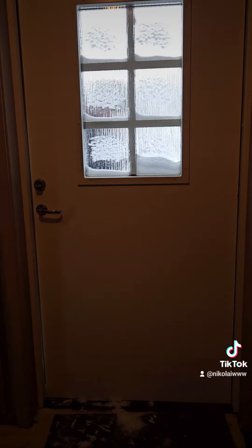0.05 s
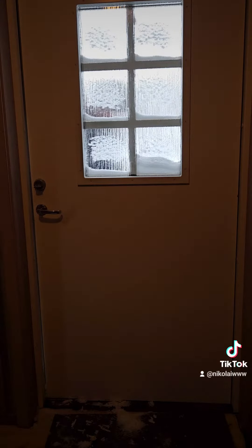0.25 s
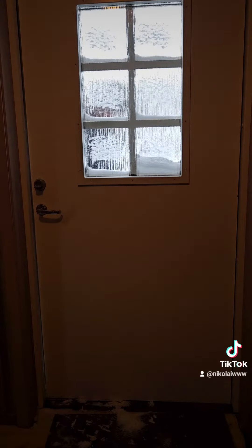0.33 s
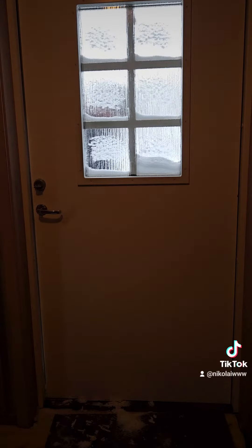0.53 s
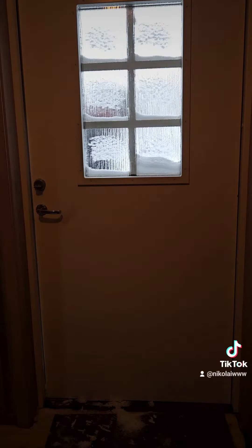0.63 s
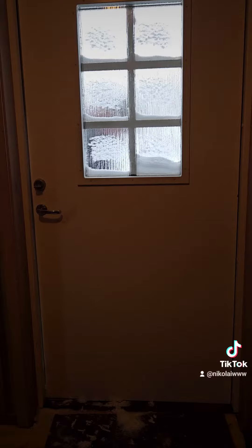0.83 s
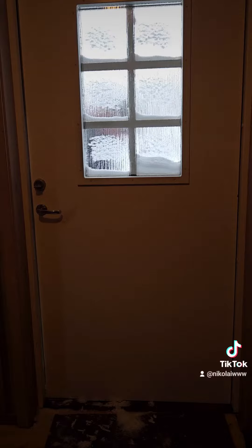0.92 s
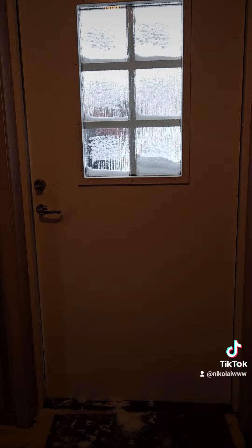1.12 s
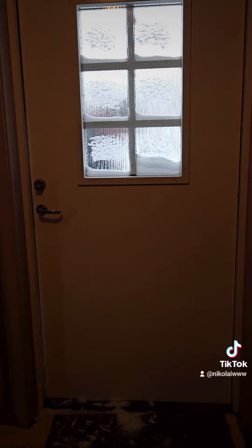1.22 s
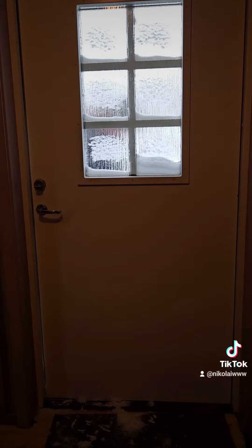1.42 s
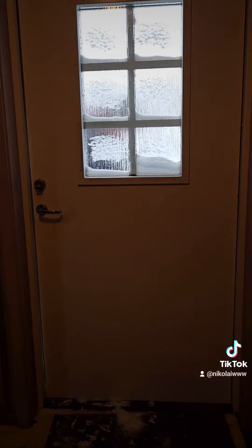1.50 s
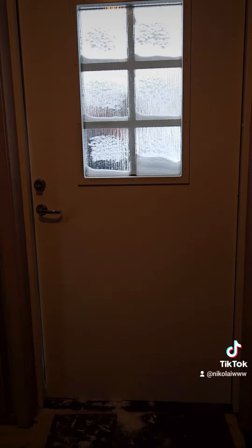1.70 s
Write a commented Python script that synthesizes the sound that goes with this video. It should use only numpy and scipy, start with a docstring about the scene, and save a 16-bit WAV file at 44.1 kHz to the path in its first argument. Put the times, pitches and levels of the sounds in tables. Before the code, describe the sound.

A stiff tool scrapes a frosty wooden door, heard from inside a small, quiet hallway. At about 0.2 seconds it lands with crunchy knocks and a deep thump. A rasping stroke runs from 0.4 to 0.9 seconds, ending in knocks. A harder stroke follows from 1.0 to 1.6 seconds, making the wood drone, with more knocks and a tiny squeak near 1.3 seconds. A faint low hush lies underneath.

```python
"""In a small, quiet hallway, a stiff tool is heard bumping against the outside of a wooden door and
scraping over its frosty face in two strokes. Stick-slip friction makes dense catches that rasp, ring the
tool's edge and drive the damped modes of the panel. Knocks crunch the frost, harder bumps rock the door
in its frame, and the edge squeaks twice. Close walls add short reflections; the house keeps a low hush."""
import sys
import numpy as np
from scipy import signal
from scipy.fft import rfft, irfft
from scipy.io import wavfile
from scipy.ndimage import uniform_filter1d

SR = 44100
rng = np.random.default_rng(int(sys.argv[2]) if len(sys.argv) > 2 else 0)


def wrap_up_sound(samples):
    """Save the sound to the file named by the first command line argument, as 16-bit audio."""
    columns = np.atleast_2d(samples).T
    # keep every value between -1 and 1, then stretch to whole-number steps
    tamed = np.clip(columns, -1, 1)
    steps = np.round(tamed * 32767).astype(np.int16)
    wavfile.write(sys.argv[1], SR, steps)


N = 77175
T = np.arange(N) / SR


def scraping():
    """Sliding friction: two strokes of the tool over the frost, the second pressed harder."""
    # Each row: time in seconds, rasp level in dB, extra treble in dB, drone level in dB, drone pitch in Hz.
    first_path = [(.33, -68, 4, -48, 230), (.40, -57, 3, -63, 300), (.445, -44, 2, -59, 383),
                  (.475, -41.5, 4.5, -38, 400), (.53, -40, 1, -42, 407), (.60, -36.5, -1, -39.5, 425),
                  (.65, -37.5, -2.5, -40.5, 354), (.70, -39.5, -3.5, -39.5, 399), (.73, -42.5, 1, -41, 180),
                  (.81, -41, 1.5, -49, 190), (.865, -50, 1, -54, 420), (.895, -60, -6, -75, 298)]
    second_path = [(1.025, -52, -24, -59, 252), (1.044, -42, -18, -39, 257), (1.06, -38.5, -32, -39.5, 242),
                   (1.118, -53, 4.5, -40.5, 243), (1.14, -34.5, -11.5, -33.5, 232),
                   (1.18, -35.5, -1, -29.5, 222), (1.21, -42.5, 0.5, -39, 211),
                   (1.262, -32.5, -3, -37.5, 248), (1.295, -31.5, -4, -31, 267),
                   (1.355, -34.5, 3.5, -30, 243), (1.395, -38, -3.5, -35, 219), (1.44, -35, 2, -34, 220),
                   (1.52, -42, -1.5, -43.5, 228), (1.605, -48, 2, -61, 220), (1.665, -75, -12, -71, 215)]
    # Each row: frequency in Hz, relative spectral density of the rasp in dB.
    first_rasp = [(30, 7.5), (65, 16), (110, 8), (420, -10), (560, 8), (950, 1.5), (1500, 2.5), (2200, 7.5),
                  (2700, -6.5), (4800, -6.5), (8800, -13.5), (9700, -23), (15500, -27)]
    second_rasp = [(30, -6), (72, 4), (115, -22), (200, -23), (420, 3), (530, -5), (660, 2), (900, -12),
                   (1500, -0.5), (2200, 1), (2700, -12.5), (4800, -10), (8800, -17), (9700, -26.5),
                   (15500, -32.5)]
    first = stroke(first_path, first_rasp, edge_db=-10.0, octaves=0.15)
    second = stroke(second_path, second_rasp, edge_db=-2.26, octaves=0.44)
    return first + second


def stroke(path, spectrum, edge_db, octaves, treble_hz=3830, groan_db=-6):
    """Forced vibration: catches rasp, ring the edge and make the panel drone at a shifting pitch."""
    # Each row: frequency of a mode of the edge in Hz, relative level in dB, 60 dB decay time in seconds.
    edge_modes = [(1576, -15, .2), (2010, 1, .014), (2125, 6, .034), (2265, 8, .045), (2340, 2, .045)]
    times, rasp_db, treble_db, drone_db, drone_hz = np.array(path).T
    rasp, drone = (np.interp(T, times, undb(db), left=0, right=0) for db in (rasp_db, drone_db))
    pitch = np.interp(T, times, drone_hz)
    grit = catches()
    dull = signal.lfilter(*signal.butter(1, treble_hz, fs=SR), grit)
    friction = rasp * (dull + undb(np.interp(T, times, treble_db)) * (grit - dull))
    edge_response = ringing(edge_modes)
    edge = through(friction, edge_response / np.linalg.norm(edge_response))
    wood = panel(grit * drone, pitch, octaves) + undb(groan_db) * drone * groan(grit, pitch)
    return colour(friction, spectrum) + undb(edge_db) * edge + wood / np.hypot(1, undb(groan_db))


def catches(per_second=2600, spread_db=3, judder_hz=75, judder_db=1.4):
    """Stick-slip: dense clicks of uneven size that swell and fade as the tool judders."""
    hit = rng.random(N) < per_second / SR
    size = undb(spread_db * np.minimum(rng.exponential(size=N), 3)) * rng.choice([-1, 1], N)
    return unit(hit * size * undb(judder_db * walk(judder_hz)))


def panel(force, contact_hz, octaves, thud_db=-2.5, thud_t60=.04):
    """Modal response, strongest near the contact's pitch: a heavily damped thud and longer rings."""
    # Each row: mode frequency in Hz, relative drive in dB, 60 dB decay time in seconds.
    panel_modes = [(74, 5, 0.19), (139.7, 1, .45), (190.6, -1.5, 0.54), (229.7, -1.5, .27),
                   (249.9, 0, 0.213), (308.8, -1, 0.13), (335, -7.5, 0.53), (364, -9, 0.26),
                   (434.1, 0, 0.32), (514, -3, 0.14), (560.6, -2.5, 0.15), (668.6, -3, 0.2),
                   (1100, -7.5, 0.21)]
    rings, thud = 0, 0
    for k, (hz, db, t60) in enumerate(panel_modes):
        drive = force / np.sqrt(1 + (np.log2(hz / contact_hz) / octaves) ** 2) * undb(db)
        rings = rings + (-1) ** k * resonate(drive, hz, t60)
        thud = thud + resonate(drive * rng.choice([-1, 1], N), hz, thud_t60)
    return unit(unit(rings) + undb(thud_db) * unit(thud)) * np.std(force)


def groan(force, hz, width_hz=62):
    """Resonance under the moving tool: a narrow band that follows the pitch of the contact."""
    carrier = np.exp(2j * np.pi * np.cumsum(hz) / SR)
    baseband = signal.lfilter(*signal.butter(2, width_hz / 2, fs=SR), force / carrier)
    return unit(np.real(carrier * baseband))


def knocks(blow_s=0.00056, blow_db=-0.5):
    """Impact: the tool lands with one blow and chatters, ringing the panel and crunching the frost."""
    # Each row: start in seconds, panel gain in dB, crunch gain in dB, chatter attack and decay in seconds,
    # pitch of the contact in Hz, its breadth in octaves.
    landings = [(.22, -31, -27.5, 0.0038, 0.027, 233, 0.15), (.243, -19.5, -38, 0.0016, 0.024, 250, 0.081),
                (.267, -25, -43.5, 0.0015, .07, 270, 0.29), (.312, -25.5, -59, 0.0017, 0.024, 140, .1),
                (.366, -28.5, -65, 0.0018, 0.011, 231, 0.16), (.463, -32.5, -55, 0.0017, 0.025, 410, 0.16),
                (.485, -31, -48, 0.0023, 0.012, 247, 0.21), (.823, -23, -27.5, 0.0013, 0.011, 405, 0.65),
                (.847, -24.5, -40, 0.0013, 0.029, 420, 0.52), (1.047, -34, -31, 0.0037, .028, 500, 0.069),
                (1.197, -26, -51, 0.0036, 0.02, 240, 0.11), (1.269, -19, -27, 0.0013, 0.01, 283, 0.19),
                (1.318, -23, -46, 0.0016, 0.017, 310, 0.12), (1.503, -34.5, -60, .002, 0.023, 147, .12)]
    # Each row: frequency in Hz, relative spectral density in dB.
    crunch_spectrum = [(100, -8.5), (500, -5.5), (780, -1), (1150, -4), (1450, -1.5), (1750, -7), (2080, 0),
                       (2600, -9.5), (4800, -13), (8800, -23), (9700, -30.5), (15500, -30.5)]
    out = np.zeros(N)
    for start, panel_db, crunch_db, attack, decay, contact_hz, octaves in landings:
        age = np.maximum(T - start, 0)
        chatter = catches() * (1 - np.exp(-age / attack)) * np.exp(-age / decay)
        blow = undb(blow_db) * np.linalg.norm(chatter) * push(start, blow_s)
        out += undb(panel_db) * panel(blow + chatter, contact_hz, octaves)
        out += undb(crunch_db) * colour(chatter, crunch_spectrum)
    return out


def bumps():
    """Long contacts excite low modes: soft, heavy pushes rock the whole door in its frame."""
    # Each row: start in seconds, impulse in dB, contact time in seconds.
    pushes = [(.217, -23, .007), (.2525, -14.5, .015), (.3565, -35, .003), (.42, -32, .014),
              (.5856, -37, .011), (.813, -36, .0095), (.895, -29, .015), (1.0495, -39, .007),
              (1.2, -38.5, .003)]
    # Each row: mode frequency in Hz, gain in dB, 60 dB decay time in seconds.
    rocking_modes = [(36.7, .6, .58), (46.4, 2.4, .23), (73.3, 0, .55)]
    force = sum(undb(db) * push(start, contact) for start, db, contact in pushes)
    return through(force, ringing(rocking_modes))


def squeaks(waver=0.0214):
    """Self-excited vibration: for a few milliseconds the edge slips at its own pitch."""
    # Each row: time of the peak in seconds, level in dB, pitch in Hz, envelope half-width in seconds.
    slips = [(.238, -42, 2050, .012), (1.281, -19, 2230, .0035)]
    out = np.zeros(N)
    for peak, db, hz, half_width in slips:
        envelope = undb(db) * np.exp(-((T - peak) / half_width) ** 2)
        pitch = hz * (1 + waver * walk(300))
        out += envelope * np.sin(2 * np.pi * np.cumsum(pitch) / SR)
    return out


def house_hush(level_db=-54.5):
    """Ambient noise: the steady hush of the house, with most of its power in the bass."""
    # Each row: frequency in Hz, relative spectral density in dB.
    hush_spectrum = [(20, 2), (45, -0.5), (65, 2), (105, -25), (250, -16.5), (340, -31), (530, -19.5),
                     (720, -34), (2300, -33), (5000, -39.5), (9000, -48.5), (15500, -84)]
    return undb(level_db) * colour(rng.standard_normal(N), hush_spectrum)


def hallway(x, patterns=4, patterns_per_s=10.953, wide_hz=756, left_lag_s=0.000345):
    """Reverberation: direct sound from slightly right, then reflections that change as the tool moves."""
    # Each row: frequency in Hz, reverberation time in seconds.
    room_t60 = [(100, 1), (500, 0.6), (2000, 0.36), (5000, 0.38), (12000, 0.11)]
    # Each row: frequency in Hz, level of the reflections over the direct sound in dB.
    room_level = [(40, -16.5), (200, -10.5), (500, -4), (1200, 3.5), (4000, 12.5), (12000, 15)]
    # Each row: frequency in Hz, left level minus right level in dB.
    balance = [(60, 7.5), (300, -2.5), (700, 0.5), (1400, -1), (2400, -4.5), (5000, -2), (9000, -0.5)]
    early_db, early_s = 3.5, 0.006  # first reflections off the close walls: level over the tail, decay
    f = np.fft.rfftfreq(N, 1 / SR)
    reflected = undb(at_hz(room_level, f))
    mid, side = rfft(rng.standard_normal((2, patterns, 1, N)))
    width = f / np.hypot(f, wide_hz)
    sides = np.array([[1], [-1]])
    diffuse = (mid + sides * width * side) / np.sqrt(1 + width ** 2) * reflected
    octave, tails = np.log2(np.maximum(f, 1)), 0
    for centre in range(5, 17, 2):
        band = np.maximum(1 - abs(octave - centre) / 2, 0)
        late = np.exp(-np.log(1000) * T / at_hz(room_t60, 2. ** centre))
        fade = late + undb(early_db) * np.exp(-T / early_s)
        tails = tails + irfft(diffuse * band, N) * fade / np.linalg.norm(fade)
    heard = irfft(rfft(x) * np.exp(-2j * np.pi * f * np.array([[left_lag_s], [0]])), N)
    for k, tail in enumerate(tails):  # each pattern of reflections crossfades into the next
        away = abs((patterns_per_s * T - k) % patterns - patterns / 2)
        share = np.cos(np.pi / 2 * np.minimum(away, 1))
        heard = heard + np.array([through(x * share, channel) for channel in tail])
    pan = undb(sides * at_hz(balance, f) / 2)
    return irfft(rfft(heard) * pan / np.sqrt(1 + reflected ** 2), N)


def resonate(x, hz, t60):
    """A damped oscillator driven by x."""
    r, turn = np.exp(-np.log(1000) / (t60 * SR)), 2 * np.pi * hz / SR
    return signal.lfilter([0, np.sin(turn)], [1, -2 * r * np.cos(turn), r * r], x)


def ringing(modes):
    """Superposition: the impulse response of a set of damped modes."""
    return sum(undb(db) * np.cos(2 * np.pi * hz * T) * np.exp(-np.log(1000) * T / t60)
               for hz, db, t60 in modes)


def push(start, length):
    """A half-sine contact force of unit impulse."""
    shape = np.sin(np.pi * np.clip((T - start) / length, 0, 1))
    return shape / shape.sum()


def colour(x, points, size=4096):
    """Minimum-phase filtering with the given spectral shape and unit energy."""
    cepstrum = irfft(np.log(undb(at_hz(points, np.fft.rfftfreq(size, 1 / SR)))))
    cepstrum[1:size // 2] *= 2
    cepstrum[size // 2 + 1:] = 0
    response = irfft(np.exp(rfft(cepstrum)))
    return through(x, response / np.linalg.norm(response))


def through(x, response):
    """Convolution with an impulse response."""
    return signal.fftconvolve(x, response)[:N]


def walk(rate):
    """Smooth random modulation with rms 1."""
    hold = max(int(SR / rate), 2)
    steps = np.repeat(rng.standard_normal(N // hold + 1), hold)
    return unit(uniform_filter1d(steps, hold)[:N])


def at_hz(points, hz):
    """Interpolation of (Hz, value) points on a log-frequency axis."""
    f, values = np.array(points, float).T
    return np.interp(np.log(np.maximum(hz, 1)), np.log(f), values)


def undb(db):
    """Decibels to amplitude ratio."""
    return 10 ** (np.asarray(db) / 20)


def unit(x):
    """Normalisation to rms 1."""
    return x / np.sqrt(np.mean(x ** 2) + 1e-20)


def scene():
    """Superposition: the sounds of the door and the hush of the house add in the hallway."""
    strokes, hush = scraping(), house_hush()
    return hallway(strokes + knocks() + bumps() + squeaks() + hush)


def record(dry, mono_below_hz=200, top_hz=15800):
    """Long waves reach closely spaced microphones alike; a low-pass filter cuts the highest treble."""
    mid, side = (dry[0] + dry[1]) / 2, (dry[0] - dry[1]) / 2
    f = np.fft.rfftfreq(N, 1 / SR)
    side = irfft(rfft(side) * f / np.hypot(f, mono_below_hz), N)
    lowpass = signal.ellip(10, .2, 80, top_hz, fs=SR, output="sos")
    return signal.sosfilt(lowpass, np.array([mid + side, mid - side]))


dry = scene()
out = record(dry)
wrap_up_sound(out)
```